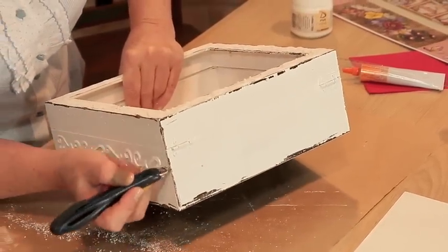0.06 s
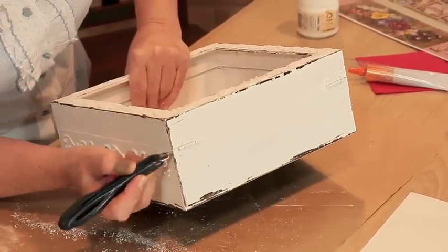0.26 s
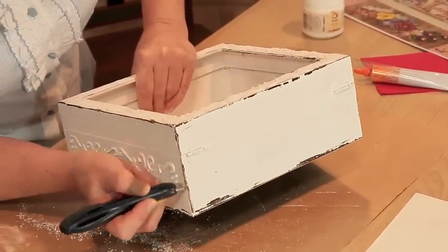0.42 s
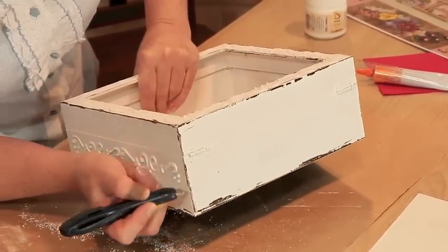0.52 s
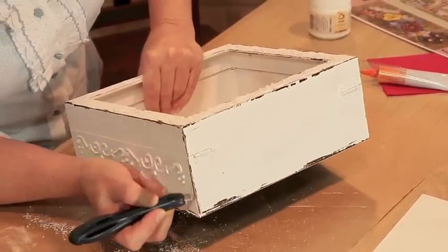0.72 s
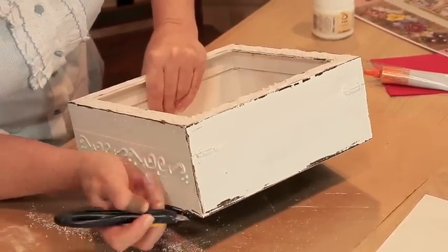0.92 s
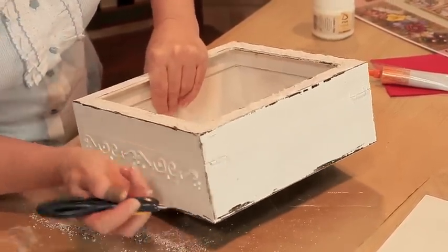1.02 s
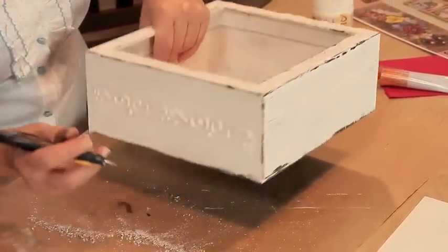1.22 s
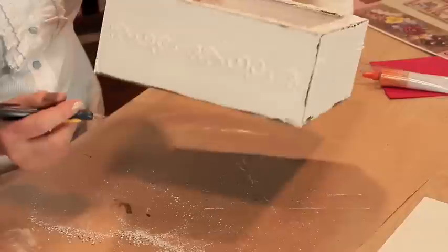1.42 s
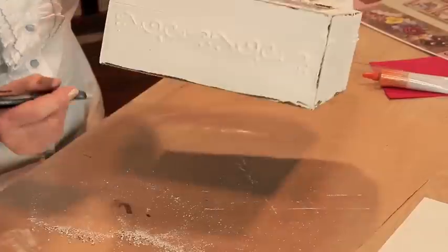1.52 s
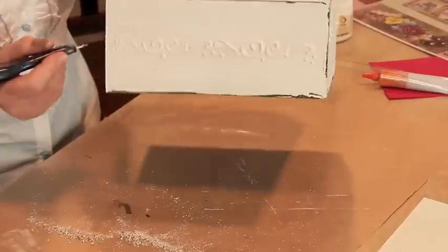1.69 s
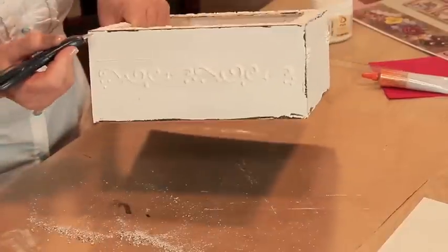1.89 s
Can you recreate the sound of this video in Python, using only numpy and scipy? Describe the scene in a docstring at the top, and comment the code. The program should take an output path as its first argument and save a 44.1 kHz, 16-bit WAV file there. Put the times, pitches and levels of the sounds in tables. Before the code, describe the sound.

A knife blade scrapes paint off a hollow wooden box, close up in a small room. Three short, dry, crackling rasps with sharp ticks come at about 0.05-0.2, 0.38-0.65 and 0.75-1.0 seconds, each with a deep panel boom. Then a sleeve brushes softly, strongest near 1.4, with a dull wooden knock at 1.44 and a much fainter one at 1.7, over low handling rumble and faint room air.

```python
"""A craft knife scrapes paint off the edge of a hollow wooden box in three short strokes, in a small room.
The blade ticks as it lands, then rasps: dense random clicks, gated by bites, excite the box's resonances.
A thin panel shakes under the rasp and booms with each stroke, as a slowly wandering sine.
Then the box is lifted and turned: a sleeve brushes along as shaped noise and the wood knocks softly, a
decaying note with a dull click, then once more and fainter. Low rumble and room air lie beneath."""
import sys
import numpy as np
from scipy import signal
from scipy.fft import rfft, irfft, next_fast_len
from scipy.io import wavfile
from scipy.ndimage import uniform_filter1d

SR = 44100
rng = np.random.default_rng(int(sys.argv[2]) if len(sys.argv) > 2 else 0)


def wav_record(signal):
    """Record a signal, one row per channel, as 16-bit PCM in the file named by sys.argv[1]."""
    frames = np.transpose(np.atleast_2d(signal))
    bounded = np.clip(frames, -1, 1)
    # unit amplitude maps onto the largest positive 16-bit level
    quanta = np.round(bounded * 32767).astype(np.int16)
    wavfile.write(sys.argv[1], SR, quanta)


N = 85995
T = np.arange(N) / SR
SIZE = 2 * next_fast_len(N)
HZ = np.maximum(np.arange(SIZE // 2 + 1) * SR / SIZE, 1)
LEFT_RIGHT = np.array([[1], [-1]])


def from_db(db):
    """Level to amplitude: 20 dB is a factor of ten."""
    return 10 ** (np.asarray(db) / 20)


def rms_one(x):
    """Normalisation to unit root-mean-square."""
    return x / np.sqrt(np.mean(np.abs(x) ** 2) + 1e-20)


def at_hz(points, hz=HZ):
    """Linear interpolation of a table along a logarithmic frequency axis."""
    f, value = np.transpose(points)
    return np.interp(np.log(hz), np.log(f), value)


def level_over_time(points):
    """Amplitude envelope from levels interpolated in decibels."""
    return from_db(np.interp(T, *np.transpose(points)))


def shaped(x, response):
    """Linear filtering: the spectrum is multiplied by a frequency response."""
    return irfft(rfft(x, SIZE) * response, SIZE)[..., :N]


def causal(gain):
    """Minimum phase by the folded cepstrum, at unit power: nothing sounds before its cause."""
    cepstrum = irfft(np.log(rms_one(gain) + 1e-6))
    cepstrum[1:SIZE // 2] *= 2
    cepstrum[SIZE // 2 + 1:] = 0
    return np.exp(rfft(cepstrum))


def stereo(mid, side, likeness):
    """Interchannel correlation: the shares of a common and an opposed signal set it at each frequency."""
    c = np.clip(at_hz(likeness), -.99, .99)
    common = shaped(mid, np.sqrt((1 + c) / 2))
    opposed = shaped(side, np.sqrt((1 - c) / 2))
    return common + opposed * LEFT_RIGHT


def drift(rate_hz):
    """Low-passed random fluctuation of unit rms."""
    return rms_one(shaped(rng.standard_normal(N), 1 / (1 + (HZ / rate_hz) ** 2)))


def resonance(hz, width_hz):
    """Damped-oscillator response, 1 at its peak, with half-power bandwidth width_hz."""
    return 1 / (1 + 1j * (HZ ** 2 - hz ** 2) / (HZ * width_hz))


def burst(start, decay_s):
    """Impulsive excitation: sudden onset, exponential decay."""
    return (T >= start) * np.exp(-np.maximum(T - start, 0) / decay_s)


# left-right correlation of the background noises: f/Hz, correlation
AIR_LIKENESS = [(40, 0.013), (200, 0.4), (1000, 0.68), (4000, 0.41), (12000, 0.053)]


def noise(spectrum):
    """Stationary stereo noise of unit rms with a given spectral density, rolled off below its first point."""
    white = stereo(*rng.standard_normal((2, N)), AIR_LIKENESS)
    low_cut = 1 / np.sqrt(1 + (spectrum[0][0] / HZ) ** 8)
    return rms_one(shaped(white, from_db(at_hz(spectrum)) * low_cut))


# spectral density of the room air: f/Hz, relative level per Hz/dB
AIR_SPECTRUM = [(80, 7), (140, -5.5), (195, 1), (250, -10.5), (370, -11), (460, -11), (680, -18.5),
                (1000, -16.5), (1600, -38), (3500, -35.5), (9500, -39), (16000, -39.5)]
AIR_DB = -42.5


def room_air():
    """Stationary random noise: the steady air of the room."""
    return from_db(AIR_DB) * noise(AIR_SPECTRUM)


# strength of the handling rumble: t/s, level/dB
HANDLING_LEVEL = [(0, -32.5), (.33, -29.5), (.72, -27.5), (1.12, -28.5), (1.35, -29.5), (1.6, -32.5),
                  (1.81, -36.5), (1.87, -27), (1.95, -33)]
# spectral density of the rumble: f/Hz, relative level per Hz/dB
HANDLING_SPECTRUM = [(34, 2.5), (43, -2), (56, 5.5), (80, -13.5), (130, -18.5), (300, -32.5), (1000, -84)]


def handling_rumble():
    """Amplitude-modulated low-frequency noise: the rumble of handling."""
    return level_over_time(HANDLING_LEVEL) * noise(HANDLING_SPECTRUM)


# strength of the brushing sleeve: t/s, level/dB
SLEEVE_LEVEL = [(.85, -50.5), (1.05, -49.5), (1.28, -47), (1.43, -44.5), (1.55, -54), (1.72, -55.5),
                (1.9, -58.5)]
# spectral density of the cloth: f/Hz, relative level per Hz/dB
SLEEVE_SPECTRUM = [(150, -26), (500, 1), (1050, 3.5), (1450, 0.5), (2100, 0.5), (3600, -9), (6500, -9),
                   (9000, -6), (13000, -11), (15500, -20)]


def sleeve():
    """Friction noise: shaped noise whose level fluctuates quickly at random as cloth brushes along."""
    roughness = from_db(0.9 * drift(98))
    return level_over_time(SLEEVE_LEVEL) * noise(SLEEVE_SPECTRUM) * roughness


# reverberation time of the room: f/Hz, T60/s
ROOM_T60 = [(150, 0.65), (500, 0.43), (1500, 0.29), (5000, 0.21), (14000, 0.16)]
# strength of the reverberant tail: f/Hz, relative level/dB
ROOM_LEVEL = [(150, -6.5), (500, -6.5), (1500, -18), (5000, -17), (14000, -34)]
TAIL_BUILD_S = 0.0097


def room(x):
    """Diffuse reverberation: convolution with octave bands of decaying noise, longest in the bass."""
    tail = 0
    for hz in 125 * 2 ** np.arange(8):
        edges = [hz / np.sqrt(2), min(hz * np.sqrt(2), SR * .45)]
        band_filter = signal.butter(2, edges, "band", fs=SR, output="sos")
        band = signal.sosfilt(band_filter, rng.standard_normal((2, N)))
        decay = np.exp(-np.log(1000) * T / at_hz(ROOM_T60, hz)) * (1 - np.exp(-T / TAIL_BUILD_S))
        tail = tail + band * decay / np.sqrt(np.sum(decay ** 2)) * from_db(at_hz(ROOM_LEVEL, hz))
    return shaped(x, rfft(tail, SIZE))


NOTE_HZ, NOTE_PEAK_S, NOTE_DB = 475, 0.0033, 0.5   # the note peaks this long after contact
CLICK_HZ, CLICK_DECAY_S, CLICK_DB = 1490, 0.0058, -12.5
# soft knocks as the box turns in the hand: t/s, relative level/dB
KNOCKS = [(1.442, -28), (1.700, -40.5)]


def knock():
    """Impact of wood: a critically damped envelope on one short note, with a dull click of resonant noise."""
    note, hits = 0, 0
    for start, db in KNOCKS:
        since = T - start
        swell = burst(start, NOTE_PEAK_S) * np.e * since / NOTE_PEAK_S
        note = note + from_db(db) * swell * np.sin(2 * np.pi * NOTE_HZ * since)
        hits = hits + from_db(db) * burst(start, CLICK_DECAY_S)
    click = shaped(flakes() * hits, rms_one(resonance(CLICK_HZ, CLICK_HZ) ** 2))
    return from_db(NOTE_DB) * note + from_db(CLICK_DB) * click


PANEL_HZ, PANEL_WIDTH_HZ, SHAKE_DB = 80.4, 21, 0.5
BOOM_WANDER_HZ, BOOM_LEFT_DB, BOOM_LEFT_LEAD_RAD = 0.81, -8, 1.85   # left relative to right
# boom in the right channel, one list per stroke, silent outside it: t/s, level/dB
BOOM_LEVEL = [
    [(.02, -30), (.09, -16), (.125, -6.5), (.22, 0.5), (.255, -8), (.31, -52)],
    [(.36, -39), (.42, -15), (.47, -21), (.51, -1), (.62, -3.5), (.66, -14.5), (.71, -46)],
    [(.74, -31), (.80, -5.5), (.828, -26), (.868, -1.5), (.945, -11.5), (.985, -6.5), (1.04, -16),
     (1.07, -25.5), (1.16, -26.5)],
]


def panel():
    """Modal vibration: the lowest mode shakes under the blade and swells into a near-pure boom, mostly right."""
    drive = bite_gain(2, WOOD_RELEASE_S) * rng.standard_normal((2, N))
    mode = resonance(PANEL_HZ, PANEL_WIDTH_HZ) * resonance(PANEL_HZ, PANEL_HZ)
    shake = from_db(SHAKE_DB) * shaped(drive, rms_one(mode))
    swell = 0
    for stroke in BOOM_LEVEL:
        times, levels = np.transpose(stroke)
        swell = swell + np.interp(T, times, from_db(levels), left=0, right=0)
    swell = uniform_filter1d(swell, size=600)   # rounds the corners
    phase = 2 * np.pi * np.cumsum(PANEL_HZ + BOOM_WANDER_HZ * drift(3.2)) / SR
    left = from_db(BOOM_LEFT_DB) * np.sin(phase + BOOM_LEFT_LEAD_RAD)
    return shake + swell * np.array([left, np.sin(phase)])


RING_AT_S, RING_DECAY_S = .950, .011
RING_HZ, RING_WIDTH_HZ, RING_DB = 4340, 124, -32


def blade_ring():
    """Free vibration: resonant noise dies away as the blade slips off the corner and springs free."""
    ringing = rms_one(shaped(flakes(), resonance(RING_HZ, RING_WIDTH_HZ)))
    return from_db(RING_DB) * burst(RING_AT_S, RING_DECAY_S) * ringing


FLAKES_PER_S, FLAKE_SPREAD_DB = 7000, 2.5
# left-right correlation of the flakes, limited to +-0.99 in use: f/Hz, correlation
FLAKE_LIKENESS = [(150, 0), (300, 0.5), (600, 1.4), (1200, 0.9), (2500, 0.75), (5000, 0.5), (10000, -0.19),
                  (15000, 0.6)]


def flakes():
    """Shot noise: paint breaks off as dense random clicks of uneven size; stereo, unit rms."""
    born = rng.random(N) < FLAKES_PER_S / SR
    sizes = born * from_db(FLAKE_SPREAD_DB * np.minimum(rng.exponential(1, N), 3))
    clicks = sizes * rng.choice([-1, 1], (2, N))
    return rms_one(stereo(*clicks, FLAKE_LIKENESS))


BODY_TOP_HZ, CRACKLE_FROM_HZ = 750, 2110
RIPPLE_DB, RIPPLE_RING_S, RIPPLE_FROM_HZ = 2, 0.017, 4000   # the crowd of small upper resonances
# broad colour of the blade on the box: f/Hz, relative level per Hz/dB
BLADE = [(100, 1.5), (190, 8), (280, 6.5), (340, -3), (450, 5), (620, 1.5), (700, -9.5), (900, -6),
         (1250, -8), (1900, -9.5), (2600, -12), (4000, -13), (5200, -4.5), (6900, -11.5), (8500, -7),
         (11000, -9), (13300, -11), (15500, -33)]
# resonances of the box: f/Hz, half-power bandwidth/Hz, height/dB
BOX_MODES = [(182, 8.6, 5.5), (206.9, 20.4, 9.5), (279, 14.6, 9.5), (428, 58, 9), (542.3, 5.3, 9.5),
             (773, 24, 11.5), (1043, 48, 11), (1104, 32, 12.5), (1380, 31, 5.5), (1524, 24, 6),
             (2260, 85, 8), (2670, 120, 8.5), (3510, 300, 9.5), (4544, 69, 7)]


def box_responses():
    """Modal filtering: box resonances on the blade's colour, as low body, middle rasp, treble crackle, all wood."""
    mode_power = 1
    for hz, width, db in BOX_MODES:
        mode_power = mode_power + (from_db(db) ** 2 - 1) * abs(resonance(hz, width)) ** 2
    gain = from_db(at_hz(BLADE)) * np.sqrt(mode_power)
    # the spectrum of a short random ringing is uneven like a dense set of modes
    ringing = rng.standard_normal(N) * T * np.exp(-2 * T / RIPPLE_RING_S)
    ripple = rms_one(rfft(ringing, SIZE).real)
    gain = gain * from_db(RIPPLE_DB * ripple * HZ / (HZ + RIPPLE_FROM_HZ))
    gain = gain / np.sqrt(1 + (BLADE[0][0] / HZ) ** 10)   # bass roll-off
    low = 1 / (1 + (HZ / BODY_TOP_HZ) ** 6)
    high = 1 / (1 + (CRACKLE_FROM_HZ / HZ) ** 6)
    power_shares = (low, (1 - low) * (1 - high), high, 1 - high)
    return [causal(gain * np.sqrt(share)) for share in power_shares]


BITE_ATTACK_S, WOOD_RELEASE_S, CRACKLE_RELEASE_S = 0.023, .011, 0.011
# each stroke is a few bites of the blade: start t/s, length/s, low wood level/dB, middle rasp level/dB,
# treble crackle level/dB
BITES = [(0.016, .058, -40, -50, -43.5), (0.08, 0.034, -23.5, -26, -39), (0.109, 0.054, -20.5, -23.5, -30),
         (0.178, 0.02, -39, -37, -48), (0.379, .04, -28, -43.5, -46.5), (0.411, 0.058, -18.5, -25, -27),
         (0.466, 0.044, -25.5, -21.5, -34.5), (.506, 0.038, -25.5, -28, -40),
         (0.561, 0.032, -25, -30, -34.5), (0.595, 0.068, -46, -57, -48), (0.754, .012, -15.5, -43, -46),
         (0.766, 0.037, -24.5, -24.5, -21.5), (.794, .03, -30.5, -17.5, -21.5),
         (.827, .036, -27, -27, -36.5)]


def bite_gain(column, release_s):
    """Excitation envelope: the blade digs in, holds and lets go, at one column of levels for all bites."""
    total = 0
    for row in BITES:
        start, length = row[:2]
        dig_in = np.clip((T - start) / BITE_ATTACK_S, 0, 1)
        let_go = np.exp(-np.maximum(T - start - length, 0) / release_s)
        total = total + from_db(row[column]) * dig_in * let_go
    return total


JUDDER_HZ, JUDDER_DB = 117, 2   # the blade catches and slips
# the blade lands or a chip snaps off: t/s, treble level/dB, wood level/dB, decay/s
TICKS = [(0.0396, -25, -17, 0.0027), (.083, -25.5, -15.5, 0.0044), (0.105, -24, -29, 0.0013),
         (0.1177, -15.5, -20, 0.0012), (.143, -21.5, -18, 0.0023), (0.274, -41, -45, 0.0061),
         (0.325, -35.5, -60, 0.001), (0.384, -26.5, -29, 0.0034), (0.426, -20.5, -18, 0.0018),
         (0.4683, -18, -27, 0.0022), (0.4792, -23, -24, .002), (.49, -22, -16.5, 0.0022),
         (0.7597, -18, -16.5, 0.0023), (.858, -17.5, -54, .0022), (0.9414, -31.5, -20.5, 0.0043),
         (.95, -22, -32, .0026), (.956, -28.5, -32, 0.0026), (1.026, -41, -34, 0.0079),
         (0.455, -20, -16, 0.0038)]
# stereo balance of the knife: f/Hz, left minus right level/dB
LEAN = [(150, 4), (600, 1), (1200, -3), (5000, -2), (9000, -0.3), (14000, -4.5)]


def knife():
    """Stick-slip friction and impact: juddering bites and sharp ticks excite the resonances of the box."""
    body, rasp, crackle, wood = box_responses()
    judder = rms_one(from_db(JUDDER_DB * drift(JUDDER_HZ)))
    snap = sum(from_db(db) * burst(start, decay) for start, db, _, decay in TICKS)
    tap = sum(from_db(db) * burst(start, decay) for start, _, db, decay in TICKS)
    drives = [(bite_gain(2, WOOD_RELEASE_S) * judder, body),
              (bite_gain(3, WOOD_RELEASE_S) * judder, rasp),
              (bite_gain(4, CRACKLE_RELEASE_S) * judder, crackle),
              (snap, crackle),
              (tap, wood)]
    scrape = sum(shaped(flakes() * drive, response) for drive, response in drives)
    return shaped(scrape, from_db(at_hz(LEAN) * LEFT_RIGHT / 2))


def scene():
    """Superposition: knife, ring and knocks with their reverberation, over panel, sleeve, rumble and air."""
    work = knife() + blade_ring() + knock()
    return work + room(work) + panel() + sleeve() + handling_rumble() + room_air()


CUTOFF_HZ = 15900


def record(dry):
    """Amplitude limiting and band limiting: peaks are clipped at full scale and the top is cut."""
    low_pass = signal.ellip(10, .1, 80, CUTOFF_HZ, fs=SR, output="sos")
    return signal.sosfilt(low_pass, np.clip(dry, -1, 1))


dry = scene()
out = record(dry)
wav_record(out)
```